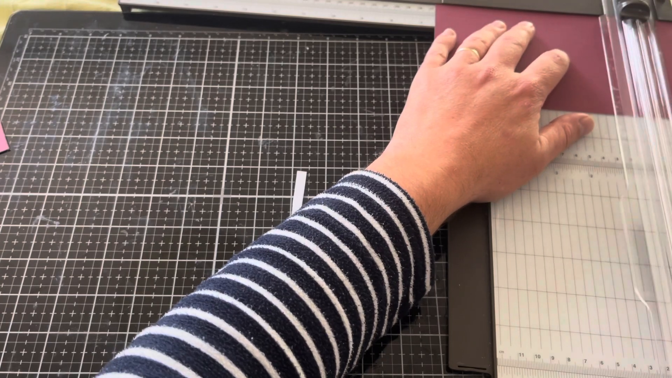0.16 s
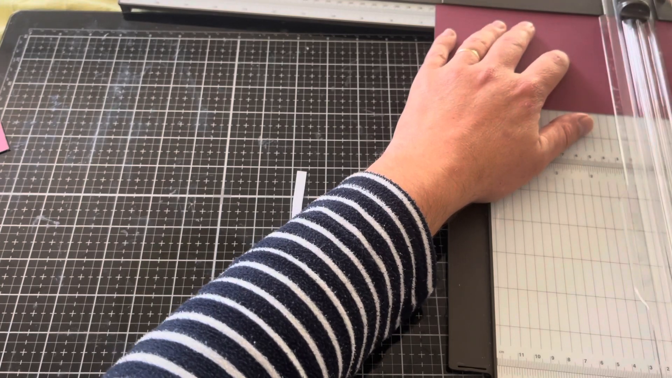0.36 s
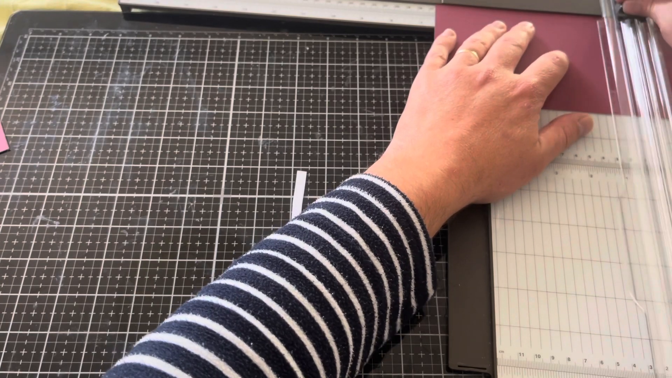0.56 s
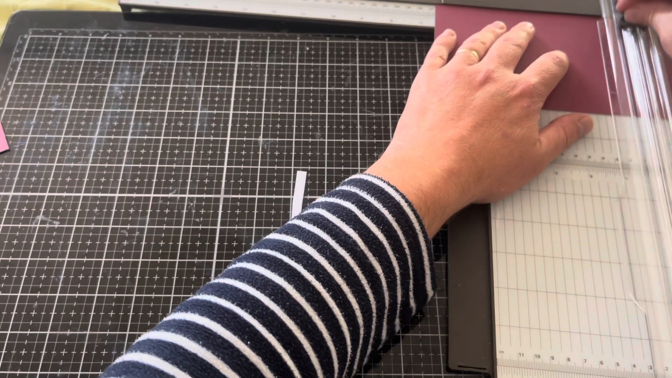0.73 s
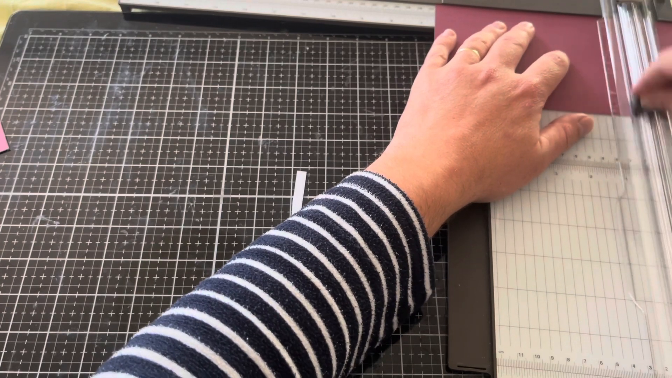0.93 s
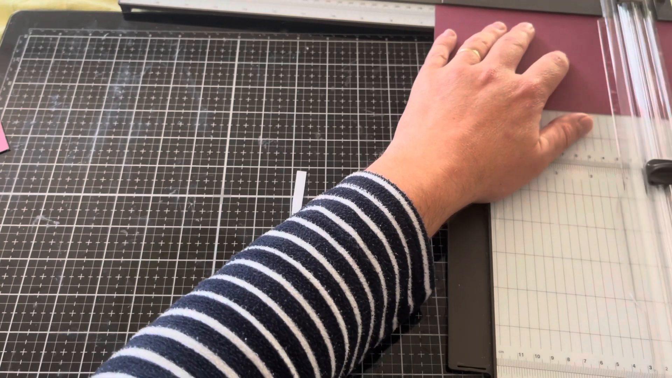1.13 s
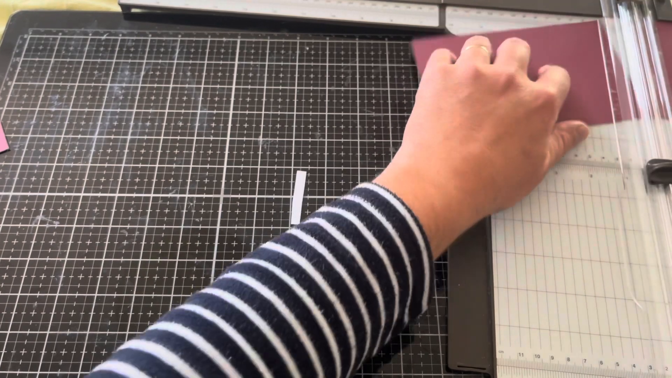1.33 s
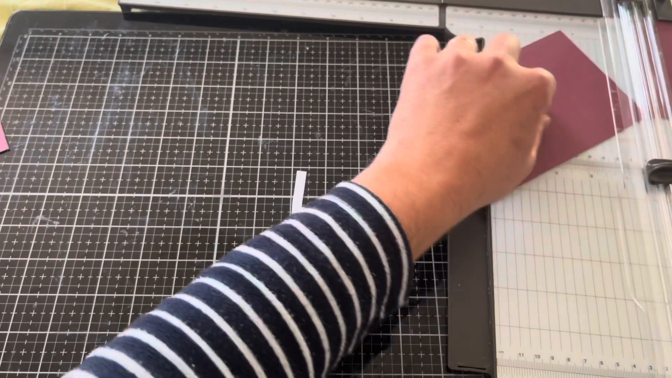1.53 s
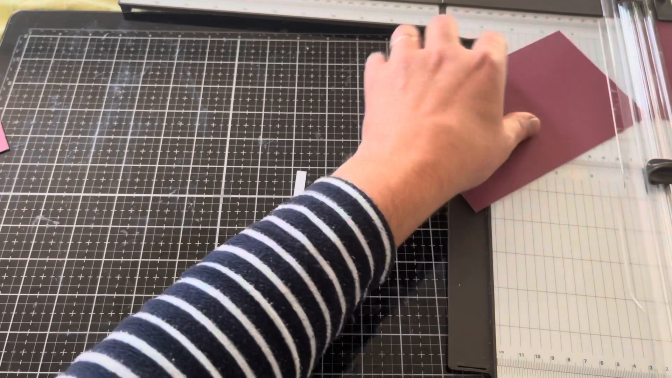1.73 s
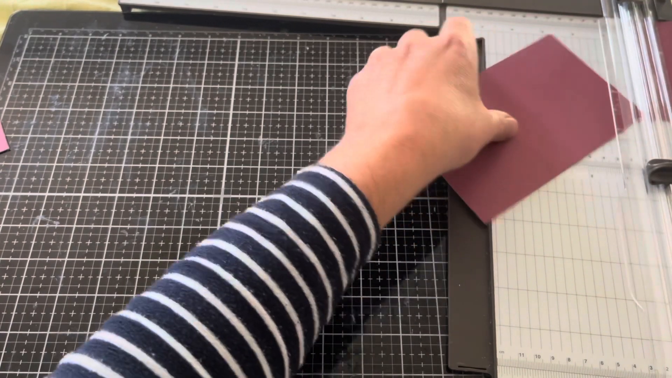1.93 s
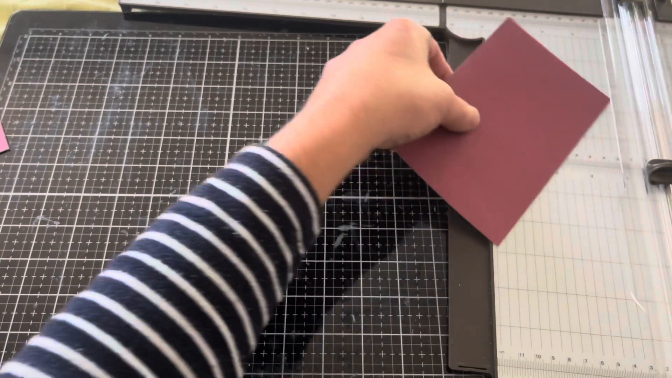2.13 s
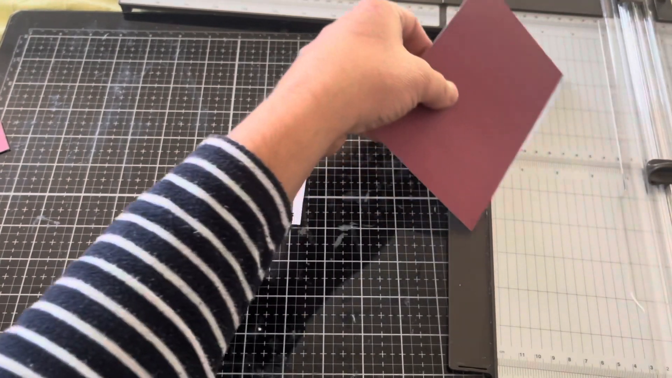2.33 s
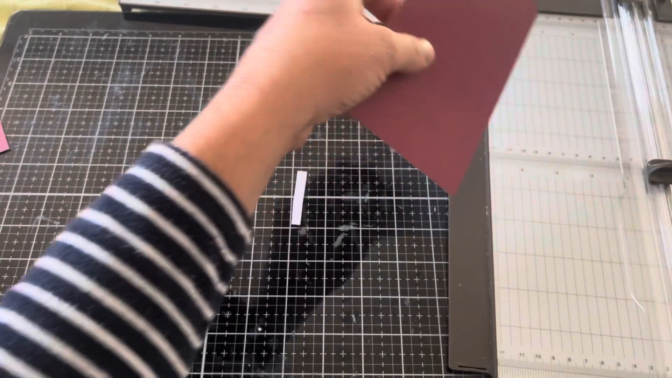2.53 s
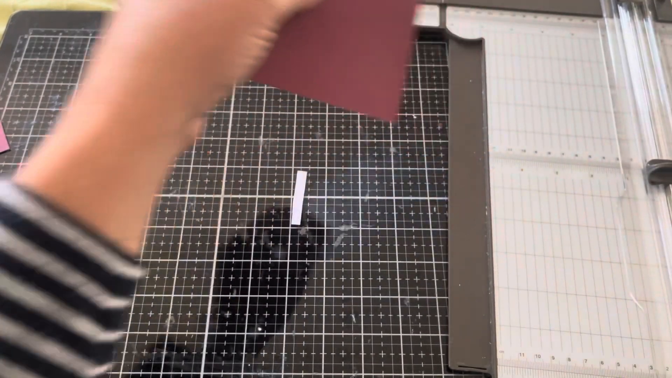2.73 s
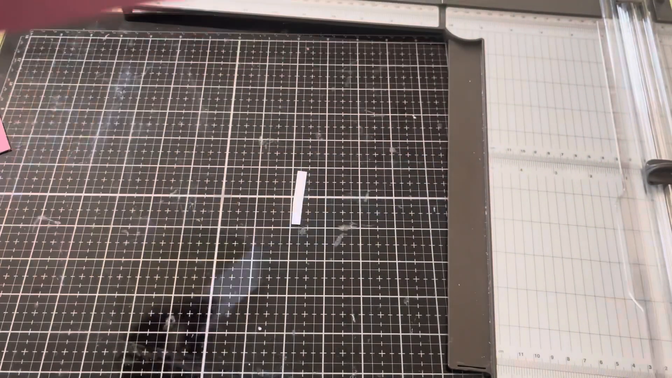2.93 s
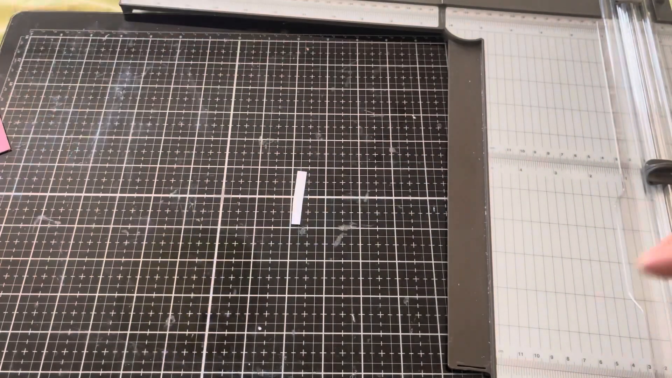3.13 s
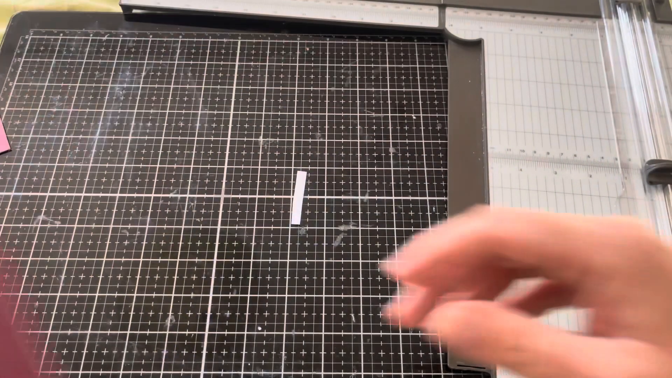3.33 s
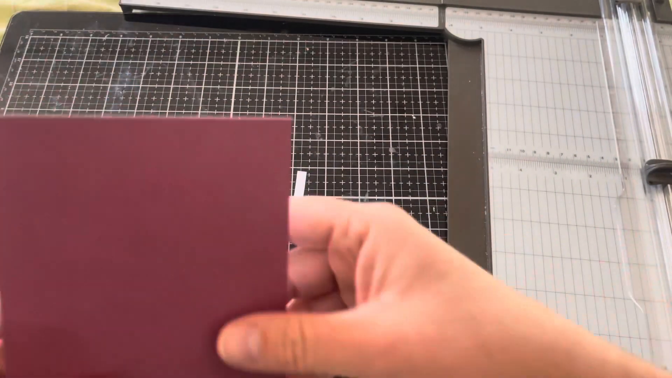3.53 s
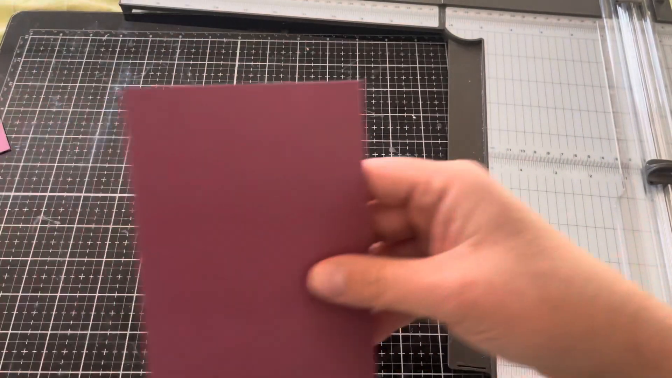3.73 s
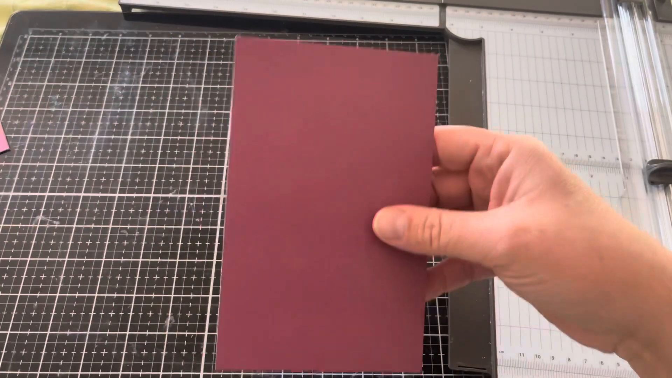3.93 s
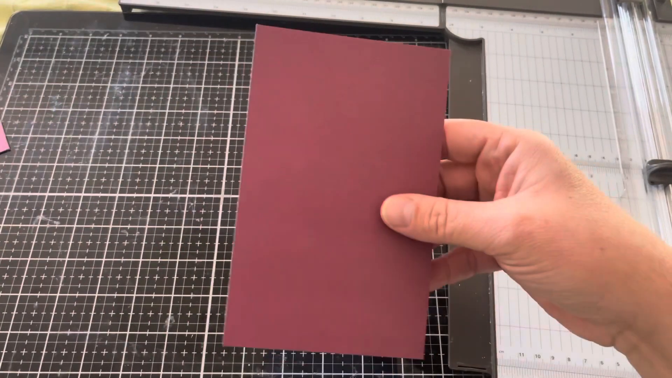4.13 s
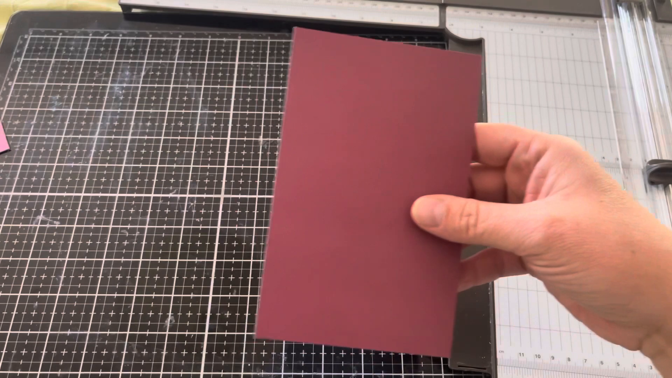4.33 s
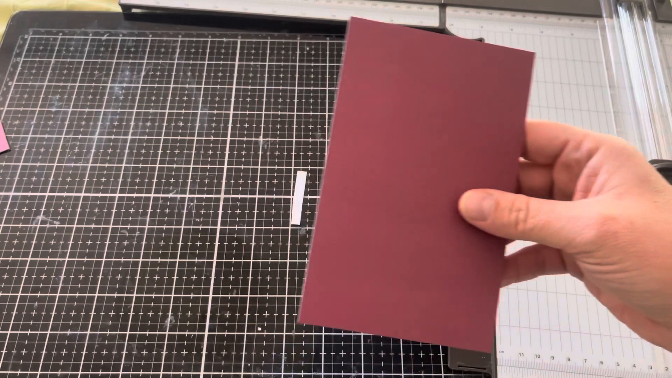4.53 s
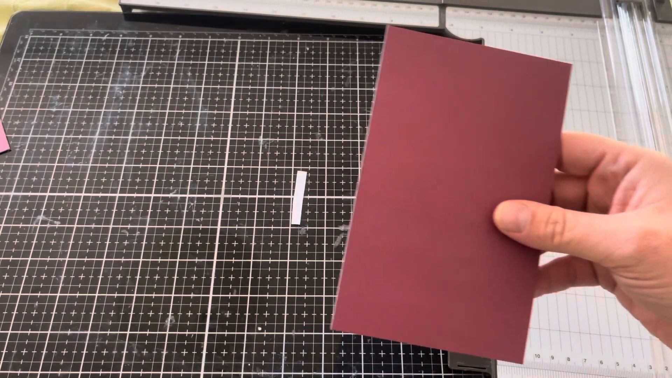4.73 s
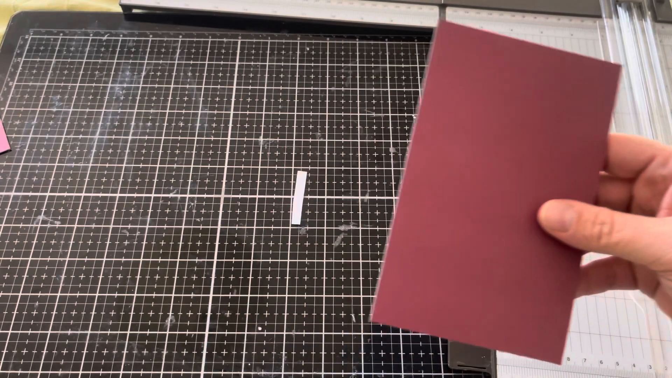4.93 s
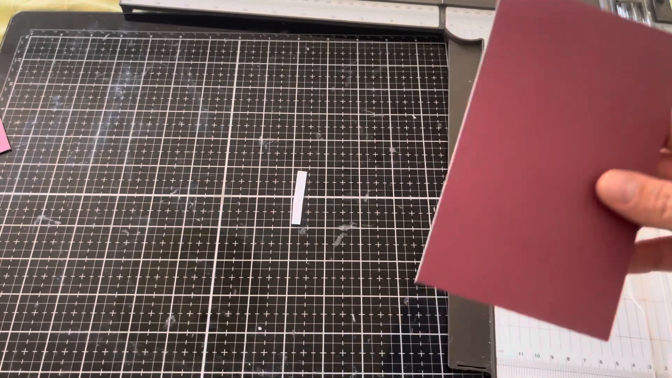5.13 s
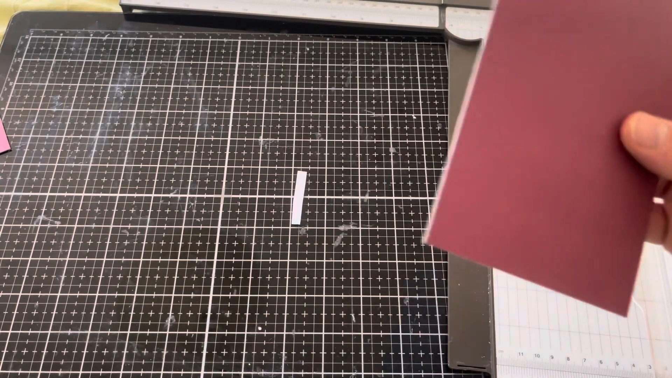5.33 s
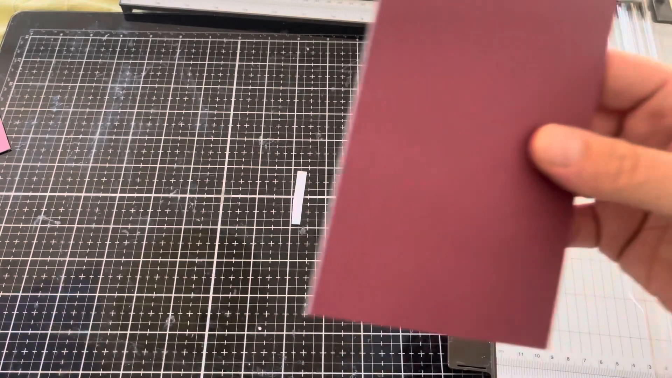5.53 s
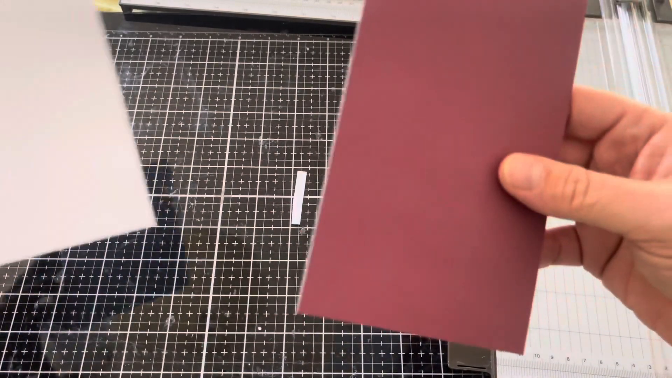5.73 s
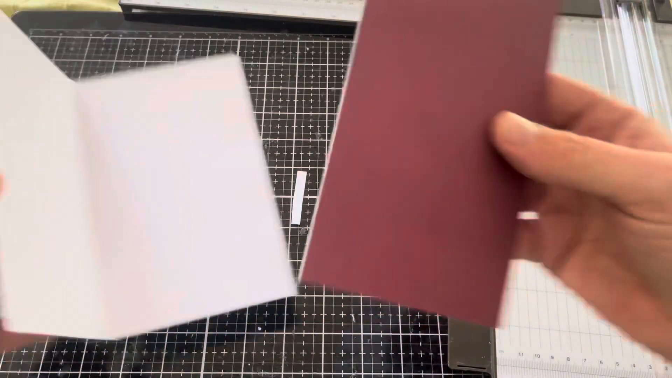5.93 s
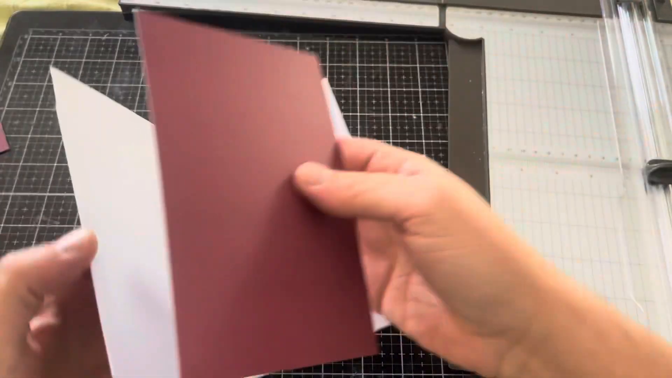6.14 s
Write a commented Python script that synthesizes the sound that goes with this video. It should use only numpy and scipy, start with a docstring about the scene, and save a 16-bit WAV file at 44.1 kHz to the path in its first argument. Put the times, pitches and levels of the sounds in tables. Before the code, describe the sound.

A quiet small room with a soft low rumble, heard close in stereo. Barely audible finger touches come first. At about 0.5 s a few small clicks run into one very loud, hard plastic clack with a bright crack and short hollow ring. From 0.68 to 0.95 s a blade rasps through cardstock, grainy and hissy, growing fuller while its high shearing hiss falls slightly; it ends in a crisp double knock, with lighter rattles until 1.1 s. Faint card sliding and rubbing follow. Around 1.8-2.1 s come clustered plastic knocks, sharp edge ticks and short scrapes. A small snap and flap sound at 2.5 s, then near quiet. At 3.52-3.6 s the stiff sheet pops in a rapid dull flutter, leaning left. Very soft dry finger rubs follow from 4.1 s, a weaker snap and flap at 5.54 s, then faint touches and a tiny knock near 6.2 s.

```python
"""Craft table in a small room, heard close up: a sliding-blade paper trimmer cuts cardstock.
The carriage snaps down, rasps through the card and hits its stop; the plastic rail rattles afterwards.
The card then slides, ticks and flexes between the fingers over a low room rumble.
Contacts are dense noise flurries, rubbing is random grains over hiss, plastic and card are resonances.
A room response and frequency-dependent stereo shading place the sounds."""
import sys
import numpy as np
from scipy import signal
from scipy.fft import rfft, irfft, next_fast_len
from scipy.io import wavfile
from scipy.ndimage import uniform_filter1d, map_coordinates

SR = 44100
rng = np.random.default_rng(int(sys.argv[2]) if len(sys.argv) > 2 else 0)


def dump_mix(stems):
    """Bounce the given channels to the path in sys.argv[1] as a 16-bit WAV at rate SR."""
    frames = np.atleast_2d(stems).T  # one column per channel
    limited = np.clip(frames, -1, 1)  # hard clip at full scale
    pcm = np.round(limited * 32767).astype(np.int16)
    wavfile.write(sys.argv[1], SR, pcm)


N = 272097

# Room rumble: (frequency [Hz], relative level [dB])
RUMBLE_COLOUR = [(20, -38), (40, -11.5), (62, -0.5), (115, -3), (170, -10.5), (300, -12.5), (400, -24),
                 (520, -20.5), (800, -32.5), (1500, -44.5), (3000, -53), (6000, -57), (9000, -52.5),
                 (16000, -80)]
# Room decay: (frequency [Hz], t60 [s])
ROOM_DECAY = [(100, .4), (500, 0.38), (2000, 0.44), (8000, 0.42), (14000, 0.12)]
# Shading by the camera body: (frequency [Hz], left-right level [dB], left lead [rad])
PORT_SHADING = [(200, -1.5, 0), (650, -2, 0.34), (1000, -1.5, 1.56), (1790, 1, 0.77), (3020, 4, 1),
                (4430, 4.5, 0.82), (4950, 4.5, 1.67), (6192, 2, 0.62), (7950, 1, 0.84), (9300, 0, 1),
                (9320, 1, -1), (11360, 0, -5.5), (14560, -1, -8.5)]

# Fingers settle on card and carriage: (start [s], length [s], level [dB], fastest point [0-1])
FINGER_TOUCHES = [(0, 0.06, -63.5, 0.02), (0.39, 0.11, -66.5, 0.95), (6.02, 0.1, -63.5, 0.38)]
# Soft skin contact: (frequency [Hz], relative level [dB per Hz])
SKIN_COLOUR = [(300, -9.5), (900, 3), (2000, -5.5), (4000, -12), (5500, -28), (10000, -34.5),
               (14000, -60.5)]

# Card edges tick and snap: (time [s], relative level [dB])
EDGE_TICKS = [(0.135, -65.5), (1.787, -41), (1.82, -40), (1.84, -52), (1.8969, -41), (1.92, -37),
              (2.5575, -41.5), (3.174, -66), (3.524, -47), (3.5347, -39), (3.558, -45), (3.5666, -43),
              (4.317, -65), (4.957, -57.5), (5.169, -63.5), (5.246, -66), (5.5403, -39), (5.5462, -40)]
# Edge snap: (frequency [Hz], relative level [dB per Hz])
SNAP_COLOUR = [(40, -7), (200, -5), (1000, 2.5), (3000, -5), (5500, -3), (7000, -6.5), (9000, 0),
               (11500, -16), (13500, -32), (16000, -45.5)]
# Resonances of the held card: (frequency [Hz], width [Hz], relative level [dB])
CARD_MODES = [(1880, 90, -3), (2170, 80, -2), (2420, 130, -3), (3340, 130, 0), (4720, 150, -4),
              (5460, 100, 0), (6500, 220, -6), (7350, 180, -5)]

# Plastic parts knock and scuff:
# (time [s], relative level [dB], relative crack level [dB], base contact time [s], clack pitch [Hz])
PLASTIC_KNOCKS = [(0.493, -36, -21.5, 0.13, 1150), (0.512, -32.5, 1, 0.089, 1150),
                  (0.521, -20, -3.5, 0.081, 1240), (0.527, -1.5, -6, 0.015, 1470),
                  (0.5285, -20.5, 12, 0.016, 1080), (0.533, -16, -12, 0.007, 700),
                  (0.572, -31, -6, 0.035, 1000), (0.952, -20.5, -3, 0.015, 2290),
                  (0.957, -23.5, -28, 0.0068, 510), (1.023, -31, -14, 0.0096, 1620),
                  (1.044, -32, -16, 0.061, 1390), (1.069, -28, -9, 0.055, 1150),
                  (1.083, -26, -16.5, 0.069, 896), (1.355, -44, -11.5, 0.06, 732),
                  (1.657, -49.5, -3.5, 0.08, 956), (1.769, -36, -22.5, 0.16, 887),
                  (1.796, -20.5, -4.5, 0.019, 820), (1.800, -18.5, -6.5, 0.056, 1160),
                  (1.822, -24.5, 1, 0.032, 1070), (1.833, -28.5, -10, 0.042, 810),
                  (1.961, -34, 2, 0.029, 1140), (2.017, -40, 6, 0.016, 2500),
                  (2.023, -28, -26, 0.036, 1020), (2.041, -39, -20, 0.05, 950),
                  (2.148, -32.5, -33, 0.041, 1280), (2.503, -48, -20, 0.31, 1119),
                  (5.482, -43, -17.5, 0.42, 966), (6.165, -42.5, -23, 0.037, 1500)]
# Clack at the reference pitch: (frequency [Hz], relative level [dB per Hz])
CLACK_COLOUR = [(30, -59.5), (150, -17.5), (400, -12.5), (750, 0), (1150, 0.5), (1500, -0.5), (2000, -4.5),
                (2800, -11), (3500, -17), (6000, -24), (14000, -47.5)]
# Treble crack: (frequency [Hz], relative level [dB per Hz])
CRACK_COLOUR = [(800, -13.5), (2500, -8.5), (4500, -5.5), (7000, -5.5), (9300, 1.5), (12000, -10.5),
                (14000, -30), (16000, -28)]
# Resonances of plastic bed and rail: (frequency [Hz], width [Hz], relative level [dB])
TRIMMER_MODES = [(205, 28, -16), (304, 30, -7), (378, 34, -13), (536, 28, 0), (630, 30, -6), (765, 30, -4),
                 (850, 45, -5), (938, 45, -4), (1210, 45, 3), (1360, 40, -3), (1640, 55, 0), (1887, 45, -6),
                 (2000, 38, -4), (2170, 65, -7), (2450, 60, -6), (2893, 90, -6)]
# Table thuds under heavier pushes: (time [s], relative level [dB], low-mode pitch [Hz], t60 [s])
TABLE_THUMPS = [(0.541, -34, 74.7, 0.3), (0.559, -32.5, 117, 0.18), (0.676, -35, 80.7, 0.13),
                (0.962, -31.5, 98, 0.17), (1.805, -33.5, 111.8, 0.49), (2.506, -37.5, 104.6, 0.23),
                (5.54, -40.5, 107.6, 0.34)]

# Blade tearing fibres: (frequency [Hz], relative level [dB per Hz])
RASP_COLOUR = [(120, -51), (200, -11.5), (500, -2.5), (650, -8.5), (1980, -8.5), (3800, -9.5),
               (5000, -14.5), (9230, -9), (12400, -17), (13800, -34), (15500, -21.5)]

# Card slides on the bed: (start [s], length [s], relative level [dB], fastest point [0-1])
CARD_SLIDES = [(1.1, 0.19, -69.5, 0.66), (1.215, 0.15, -62.5, 0.6), (1.33, 0.22, -61.5, 0.28),
               (1.69, 0.12, -65, 0.77), (1.792, 0.061, -47.5, 0.82), (1.88, 0.096, -54.5, 0.8),
               (1.955, 0.049, -47.5, 0.5), (1.985, 0.036, -44.5, 0.54), (2.03, 0.25, -63.5, 0.17),
               (2.499, 0.028, -59, 0.27)]
# Sliding hiss: (frequency [Hz], relative level [dB per Hz])
SLIDE_COLOUR = [(500, -11), (1000, -13), (1500, -5), (7000, -7), (9000, 0), (11500, -7.5), (12600, -40),
                (16000, -59)]
# Card drags over the bed: (start [s], length [s], level [dB], fastest point [0-1])
CARD_DRAGS = [(1.86, 0.18, -49, 0.44), (1.952, 0.034, -44, 0.36), (2.018, 0.11, -44.5, 0.05)]
# Pressed drag: (frequency [Hz], relative level [dB per Hz])
DRAG_COLOUR = [(100, -5), (230, 2), (380, -4.5), (650, 2), (900, -3), (1500, -15.5), (2500, -22),
               (5000, -56)]

# Fingers rub the card:
# (start [s], length [s], relative level [dB], fastest point [0-1], relative fizz level [dB])
CARD_RUBS = [(1.263, .1, -57, 0.1, -8), (2.759, 0.12, -70, 0.22, -4), (2.859, 0.16, -71, 0.49, -4),
             (4.136, 0.11, -65.5, 0.3, -1), (4.28, .15, -76, 0.35, -2), (4.612, 0.077, -62.5, 0.41, 0),
             (4.785, .15, -66.5, 0.85, 5), (4.919, 0.11, -64, 0.25, 4), (5.048, .12, -81, 0.95, 8.5),
             (5.198, 0.071, -74, .5, -4), (5.537, 0.077, -59, 0.08, -10), (5.873, .1, -65, 0.5, -3)]
# Skin on card: (frequency [Hz], relative level [dB per Hz])
FINGER_COLOUR = [(500, -22), (1100, -1), (1600, 1.5), (5500, -2.5), (9500, -12.5), (12000, -36),
                 (14000, -59)]
# Dry fizz: (frequency [Hz], relative level [dB per Hz])
FIZZ_COLOUR = [(3000, -53), (6000, -14), (9000, 2), (11400, -6), (12800, -39), (16000, -43)]

# Bent sheet pops: (time [s], relative level [dB], left-right level [dB])
SHEET_FLAPS = [(2.509, -39.5, -2), (2.535, -42, 6), (2.562, -46, -5), (3.537, -30, 9), (3.549, -28.5, 10.5),
               (3.553, -22.5, 6.5), (3.567, -25, -1), (3.575, -22, 5.5), (3.586, -32.5, 4),
               (3.595, -23.5, 5.5), (3.605, -34.5, 2), (5.546, -33, 7), (5.567, -37, 3)]
# Dull sheet pop: (frequency [Hz], relative level [dB per Hz])
SHEET_COLOUR = [(25, -30), (60, 1.5), (150, -5.5), (330, -2), (580, -4.5), (850, -16), (1300, -25),
                (4000, -47.5)]

RUMBLE_DB = -52.5
KNOCKS_TO_ROOM_DB, TICKS_TO_ROOM_DB, RUBBING_TO_ROOM_DB, FLAPS_TO_ROOM_DB = -17.5, -10, -11.5, -18
LIMIT_PEAK, TOP_HZ = 0.92, 15800
EVEN_HZ = 394  # width over which a flurry's energy is evened out
SPEED_EXPONENT = 0.93  # rubbing gain over hand speed
PATCHY_DB = 2.5  # rms gain change as the contact moves
TICK_SHIVER_T60_S = 0.22
FLEX_DEPTH_S, FLEX_RATE_PER_S = 0.00018, 14  # delay waver of the flexing card
CLACK_REFERENCE_HZ = 1150
DETUNE_SHARE, PLASTIC_RING_DB = 0.003, -10  # random shift per mode and knock; ring gain
CUT_START_S, CUT_STOP_S, CUT_FORCE_DB = 0.675, 0.93, -41.5
BITE_S, LET_GO_S = 0.02, 0.041
BODY_HZ, BODY_START_DB, BODY_FULL_S = 2980, -8, 0.95  # rasp below BODY_HZ fills out until BODY_FULL_S
SHEAR_START_HZ, SHEAR_STOP_HZ, SHEAR_WIDTH_HZ, SHEAR_DB = 9000, 7740, 550, -7
SING_START_DB, SING_STOP_DB = -15, -9  # rail ring grows towards the stop
CRINKLE_RATE_PER_S, CRINKLE_DB = 70, -7  # tiny creases giving way
CARD_RING_DB = -10  # relative to the rub
FLAP_TAIL_DB, FLAP_TAIL_T60_S = -12, 0.08  # shiver after each pop


def amp(db):
    """Decibels to gain."""
    return 10 ** (np.asarray(db) / 20)


def unit(x):
    """Scale to rms 1."""
    return x / np.sqrt(np.mean(x ** 2) + 1e-20)


def along(points, hz):
    """Interpolate (Hz, value) points on a log frequency axis."""
    f, v = np.transpose(points)
    return np.interp(np.log(hz + 1), np.log(f + 1), v)


def wobble(rate_per_s):
    """Smooth random curve with the given knot rate."""
    knots = rng.standard_normal(int(N * rate_per_s / SR) + 4)
    return map_coordinates(knots, [np.arange(N) * rate_per_s / SR])


def filtered(x, response):
    """Apply a frequency response to x."""
    size = x.shape[-1]
    m = next_fast_len(size + SR // 4)
    return irfft(rfft(x, m) * response(np.fft.rfftfreq(m, 1 / SR)), m)[..., :size]


def coloured(x, spectrum, size=4096):
    """Minimum-phase filter with the given (Hz, dB) colour."""
    cepstrum = irfft(np.log(amp(along(spectrum, np.fft.rfftfreq(size, 1 / SR)))))
    # fold the cepstrum to make the filter causal
    cepstrum[1:size // 2] *= 2
    cepstrum[size // 2 + 1:] = 0
    impulse = irfft(np.exp(rfft(cepstrum)))
    return signal.fftconvolve(x, impulse)[:len(x)]


def add(track, s, sound):
    """Mix a sound in at time s."""
    part = track[max(round(s * SR), 0):][:len(sound)]
    part += sound[:len(part)]


def fade(t, t60):
    """Exponential decay, 60 dB down at t60."""
    return np.exp(-np.log(1000) * t / t60)


def burst(spectrum, rise_s, t60_s, tail_db, tail_t60_s):
    """Contact: dense pitchless micro-impacts, then a weaker shiver; about rms 1 at its height."""
    t = np.arange(SR // 2) / SR
    decay = fade(t, t60_s) + amp(tail_db) * fade(t, tail_t60_s)
    shape = (1 - np.exp(-(t / rise_s) ** 2)) * decay
    z = rfft(rng.choice([-1, 1], len(t)) * shape)
    power = uniform_filter1d(np.abs(z) ** 2, size=max(int(EVEN_HZ * t[-1]), 1))
    flurry = irfft(z / np.sqrt(np.abs(power) + 1e-20), len(t))
    flurry *= np.clip(1 - t / (t[-1] / 2), 0, 1)
    x = coloured(flurry, spectrum)
    return x * np.linalg.norm(shape / shape.max()) / np.linalg.norm(x)


def friction(spectrum, rate_per_s, spread_db, hiss_db):
    """Fibres catch and let go: grains of random size over fine hiss, rms 1."""
    sizes = amp(spread_db * np.minimum(rng.exponential(size=N), 4))
    grains = (rng.random(N) < rate_per_s / SR) * sizes * rng.choice([-1, 1], N)
    hiss = amp(hiss_db) * rng.standard_normal(N)
    return unit(coloured(unit(grains) + hiss, spectrum))


def patchy(x):
    """Small shifting patches of gain in time and frequency, at unchanged rms."""
    z = signal.stft(x, nperseg=512)[2]
    field = uniform_filter1d(rng.standard_normal(z.shape), size=6, axis=0)
    field = uniform_filter1d(field, size=4, axis=1)
    y = signal.istft(z * amp(PATCHY_DB * unit(field)), nperseg=512)[1][:N]
    return unit(y) * np.std(x)


def resonant(x, modes):
    """Drive a body's (Hz, width Hz, dB) modes with x, at unchanged rms."""
    def body(hz):
        total = 0
        for k, (centre_hz, width_hz, db) in enumerate(modes):
            band = 1j * hz * width_hz
            total = total + (-1) ** k * amp(db) * band / (centre_hz ** 2 - hz ** 2 + band)
        return total
    return unit(filtered(x, body)) * np.std(x)


def strokes(rows):
    """Hand-stroke gain: speed rises from rest, peaks at the fastest point and falls to a stop."""
    t, gain = np.arange(N) / SR, np.zeros(N)
    for s, length, db, fastest in rows:
        turn = s + length * np.clip(fastest, .02, .98)
        speed = np.sin(np.pi / 2 * np.interp(t, [s, turn, s + length], [0, 1, 0]))
        gain += amp(db) * speed ** SPEED_EXPONENT
    return gain


def room_tone():
    """Steady low rumble: shared noise plus a side part that is weakest in the bass."""
    shared, apart = filtered(rng.standard_normal((2, N)), lambda hz: amp(along(RUMBLE_COLOUR, hz)))
    side = filtered(apart, lambda hz: amp(along([(60, -23.0), (400, -4.0), (3000, 1.0)], hz)))
    return amp(RUMBLE_DB) * np.array([shared + side, shared - side]) / np.std(shared)


def finger_touches():
    """Soft skin friction as fingers settle."""
    return strokes(FINGER_TOUCHES) * friction(SKIN_COLOUR, rate_per_s=1300, spread_db=3.5, hiss_db=-3)


def sheet_ring(x):
    """Card resonances driven by x waver in delay as the card flexes."""
    delay = FLEX_DEPTH_S * SR * wobble(FLEX_RATE_PER_S)
    return map_coordinates(resonant(x, CARD_MODES), [np.arange(N) - delay])


def card_ticks():
    """Stiff edges slip off rail and fingertips: short snaps that ring the sheet."""
    out = np.zeros(N)
    for s, db in EDGE_TICKS:
        snap = burst(SNAP_COLOUR, rise_s=0.0033, t60_s=0.016, tail_db=-26.5, tail_t60_s=TICK_SHIVER_T60_S)
        add(out, s, amp(db - 1.5) * snap)
    return out + amp(-9.5) * sheet_ring(out)


def trimmer_knocks():
    """Impacts between plastic parts: a clack, a bright crack and decaying body modes."""
    out, t = np.zeros(N), np.arange(SR // 2) / SR
    hz, width, mode_db = np.transpose(TRIMMER_MODES)[:, :, None]
    for s, db, crack_db, contact_s, pitch_hz in PLASTIC_KNOCKS:
        # smaller, harder parts clack higher
        colour = [(f * pitch_hz / CLACK_REFERENCE_HZ, level) for f, level in CLACK_COLOUR]
        clack = burst(colour, rise_s=0.0016, t60_s=1.2 * contact_s, tail_db=-22.0, tail_t60_s=0.12)
        crack = burst(CRACK_COLOUR, rise_s=0.0009, t60_s=.8 * contact_s, tail_db=-24.0, tail_t60_s=0.19)
        strength = amp(mode_db + 0.64 * rng.standard_normal(hz.shape)) * rng.choice([-1, 1], hz.shape)
        shifted_hz = hz * (1 + DETUNE_SHARE * rng.standard_normal(hz.shape))
        modes = strength * np.exp(-np.pi * width * t) * np.sin(2 * np.pi * shifted_hz * t)
        ring = np.sum(modes, axis=0) * (1 - fade(t, 0.11))
        knock = amp(-6.5) * clack + amp(crack_db - 7.0) * crack + amp(PLASTIC_RING_DB) * ring
        add(out, s, amp(db) * knock)
    return out


def table_thumps():
    """Two low table modes build up and decay after each heavy push."""
    out, t = np.zeros(N), np.arange(SR) / SR
    for s, db, pitch_hz, t60_s in TABLE_THUMPS:
        cycles = np.outer([pitch_hz, 1.36 * pitch_hz], t) + rng.random((2, 1))
        low, high = np.sin(2 * np.pi * cycles)
        add(out, s, amp(db) * (low + amp(-8.0) * high) * fade(t, t60_s) * (1 - fade(t, 0.025)))
    return out


def blade():
    """Tearing fibres rasp, fuller as the blade sinks in; the rail sings and the shearing hiss falls."""
    t = np.arange(N) / SR
    bite = np.clip((t - CUT_START_S) / BITE_S, 0, 1)
    bite *= np.clip(1 - (t - CUT_STOP_S) / LET_GO_S, 0, 1)
    force = amp(CUT_FORCE_DB) * bite * amp(.5 * wobble(40) + 1.3 * wobble(220))

    rasp = force * patchy(friction(RASP_COLOUR, rate_per_s=1100, spread_db=2.0, hiss_db=0.5))
    body = filtered(rasp, lambda hz: 1 / (1 + (hz / BODY_HZ) ** 4))
    body_gain = amp(np.interp(t, [CUT_START_S, BODY_FULL_S], [BODY_START_DB, 0]))
    rasp = rasp - body + body * body_gain

    shear_hz = np.interp(t, [CUT_START_S, CUT_STOP_S], [SHEAR_START_HZ, SHEAR_STOP_HZ])
    flutter = filtered(rng.standard_normal(N), lambda hz: 1 / (1 + (hz / SHEAR_WIDTH_HZ) ** 4))
    shear = flutter * np.sin(2 * np.pi * np.cumsum(shear_hz) / SR)
    shear = amp(SHEAR_DB) * force * unit(shear)

    sing = amp(np.interp(t, [CUT_START_S, CUT_STOP_S], [SING_START_DB, SING_STOP_DB]))
    return amp(2.67) * rasp + shear + sing * resonant(rasp, TRIMMER_MODES)


def card_slides():
    """Sliding card hisses; pressed on the bed it drives the hollow plastic."""
    pressure = strokes(CARD_SLIDES) * amp(wobble(18) + 1.5 * wobble(50) + .8 * wobble(200))
    hiss = patchy(friction(SLIDE_COLOUR, rate_per_s=4300, spread_db=3.5, hiss_db=-3.5))
    drag = friction(DRAG_COLOUR, rate_per_s=2400, spread_db=11.5, hiss_db=4.0)
    drag = strokes(CARD_DRAGS) * amp(0.8 * wobble(47.7)) * drag
    return amp(5.0) * pressure * hiss + drag + amp(-20) * resonant(drag, TRIMMER_MODES)


def finger_rubs():
    """Skin catches unevenly: a grainy, crinkling rub rings the card, with dry fizz on top."""
    grip = amp(1.2 * wobble(35) + 1.3 * wobble(130))
    crinkles = friction(FINGER_COLOUR, rate_per_s=CRINKLE_RATE_PER_S, spread_db=3, hiss_db=-40)
    rub = patchy(friction(FINGER_COLOUR, rate_per_s=1500, spread_db=1, hiss_db=0.5))
    rub = rub + amp(CRINKLE_DB) * crinkles
    rub = grip * strokes([row[:-1] for row in CARD_RUBS]) * rub
    fizz_rows = [(s, length, db + fizz_db, fastest) for s, length, db, fastest, fizz_db in CARD_RUBS]
    fizz = patchy(friction(FIZZ_COLOUR, rate_per_s=1200, spread_db=1, hiss_db=-4))
    fizz = grip * strokes(fizz_rows) * fizz
    return amp(-0.7) * (rub + amp(CARD_RING_DB) * sheet_ring(rub)) + amp(3.0) * fizz


def card_buckles():
    """Each flap of the bent sheet is a dull pop with a shiver, panned by level."""
    left, right = np.zeros((2, N))
    for s, db, pan_db in SHEET_FLAPS:
        pop = burst(SHEET_COLOUR, rise_s=0.00068, t60_s=0.016,
                    tail_db=FLAP_TAIL_DB, tail_t60_s=FLAP_TAIL_T60_S)
        pop = amp(db - 4.5) * pop
        add(left, s, amp(pan_db / 2) * pop)
        add(right, s, amp(-pan_db / 2) * pop)
    return np.array([left, right])


def room(x):
    """Walls answer with a gradual onset and per-frequency decay; fresh random tails every quarter second."""
    out = np.zeros((2, N))
    step = SR // 4
    for start in range(0, N, step):
        hz, t, z = signal.stft(rng.standard_normal((2, SR // 2)), SR, nperseg=256)
        tails = signal.istft(z * fade(t, along(ROOM_DECAY, hz)[:, None]), SR, nperseg=256)[1]
        tails = tails * (1 - fade(np.arange(tails.shape[1]) / SR, 0.091))
        for track, tail in zip(out, tails):
            answer = signal.fftconvolve(x[start:start + step], tail / np.linalg.norm(tail))
            add(track, start / SR, answer)
    mid = out[0]
    side = filtered(out[1], lambda hz: amp(along([(150, -12.0), (800, -0.5), (3000, -4.5)], hz)))
    return np.array([mid + side, mid - side])


def ports(x):
    """The camera body shades and delays two ports differently at each frequency."""
    f, tilt_db, lead_rad = np.transpose(PORT_SHADING)

    def response(hz):
        level = amp(along(np.c_[f, tilt_db], hz) / 2)
        left = level * np.exp(.5j * along(np.c_[f, lead_rad], hz))
        return np.array([left, 1 / left])
    return filtered(x, response)


def scene():
    """Trimmer and card, direct and through the room, over the rumble."""
    rumble = room_tone()
    ticks, knocks, flaps = card_ticks(), trimmer_knocks(), card_buckles()
    rubbing = finger_touches() + blade() + card_slides() + finger_rubs()
    to_room = amp(KNOCKS_TO_ROOM_DB) * knocks + amp(TICKS_TO_ROOM_DB) * ticks
    to_room += amp(RUBBING_TO_ROOM_DB) * rubbing + amp(FLAPS_TO_ROOM_DB) * flaps.mean(axis=0)
    direct = ports(knocks + table_thumps() + ticks + rubbing + flaps)
    return direct + room(to_room) + rumble


def record(dry):
    """Round off the loudest peaks, then roll off steeply above TOP_HZ."""
    limited = dry / (1 + np.abs(dry / LIMIT_PEAK) ** 8) ** (1 / 8)
    return filtered(limited, lambda hz: 1 / (1 + (hz / TOP_HZ) ** 120))


dry = scene()
out = record(dry)
dump_mix(out)
```